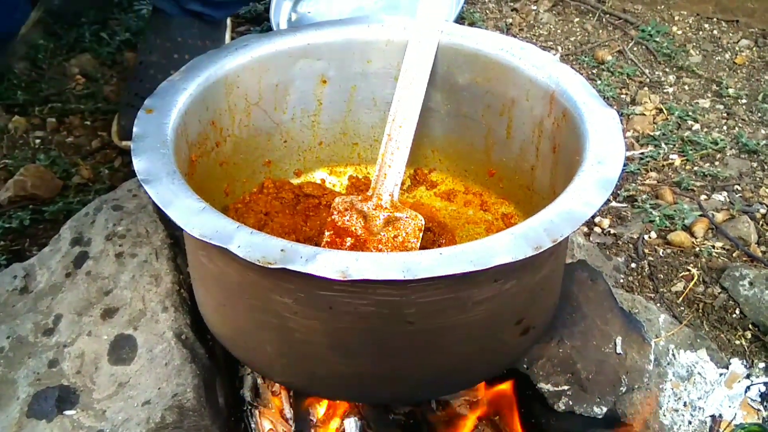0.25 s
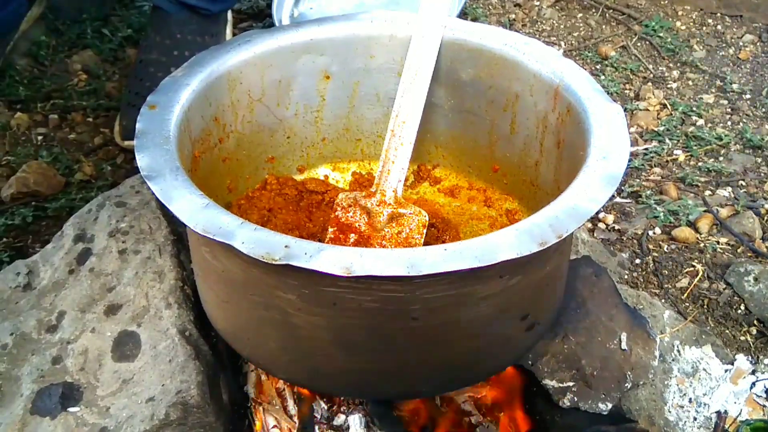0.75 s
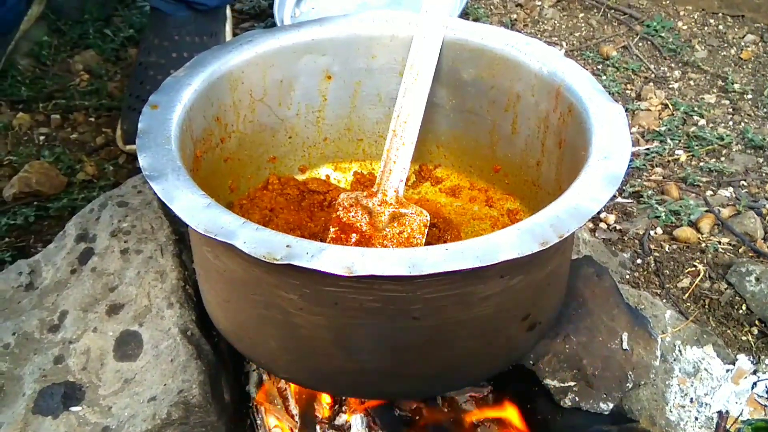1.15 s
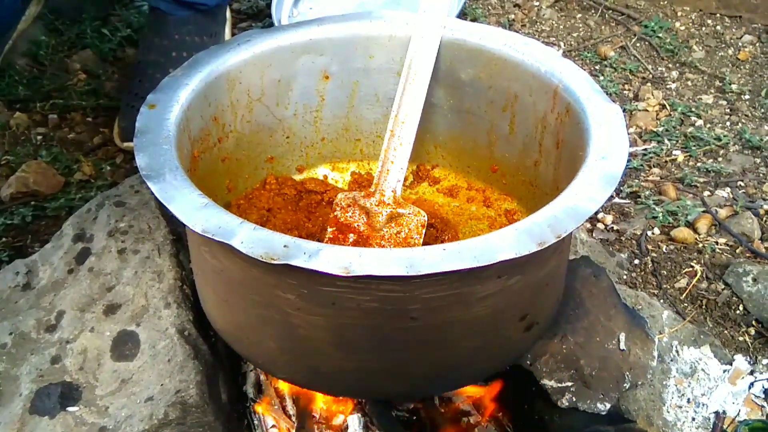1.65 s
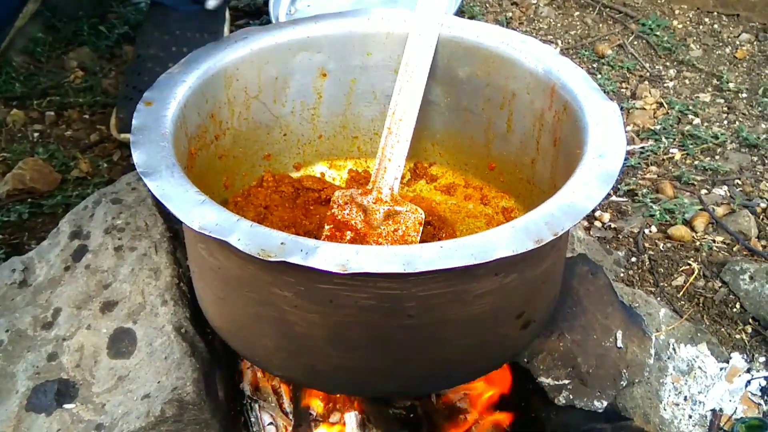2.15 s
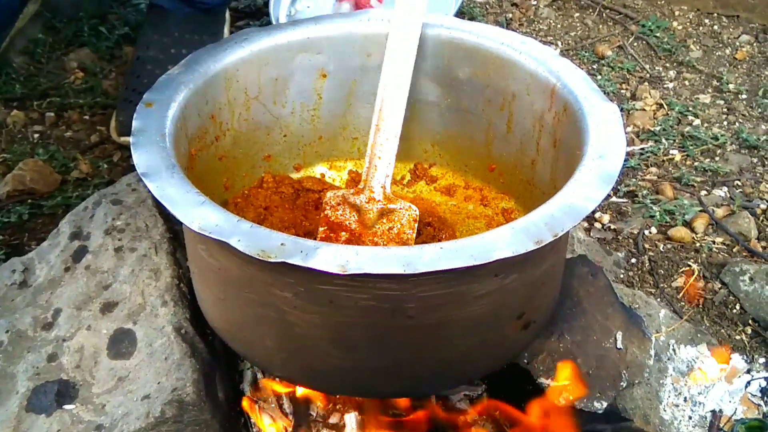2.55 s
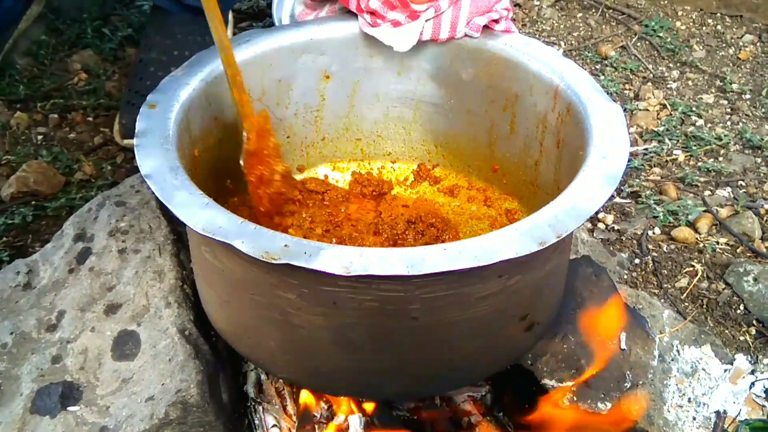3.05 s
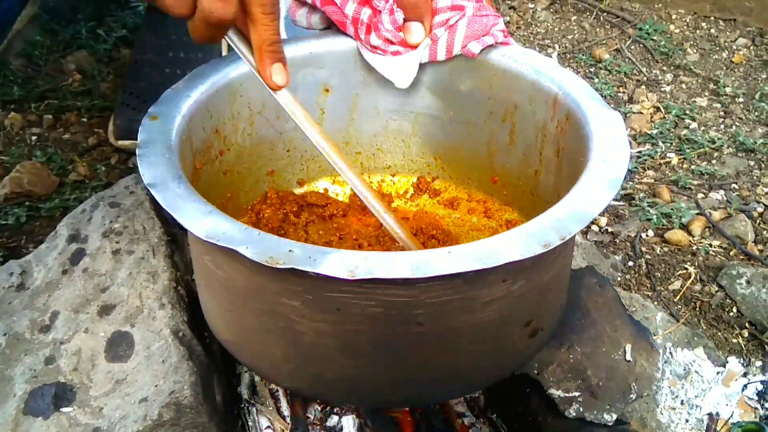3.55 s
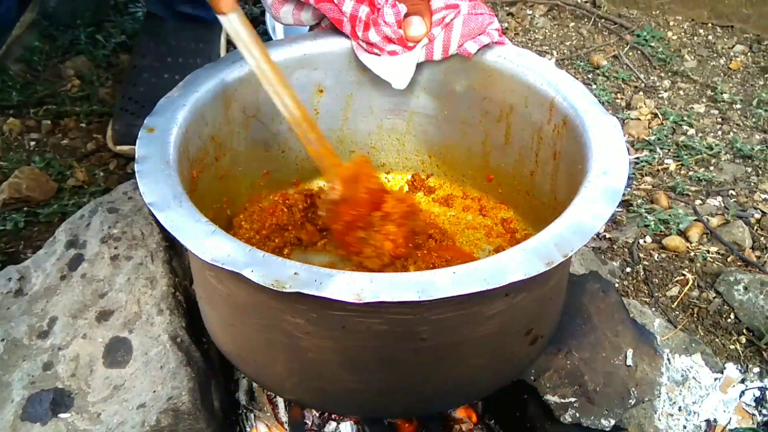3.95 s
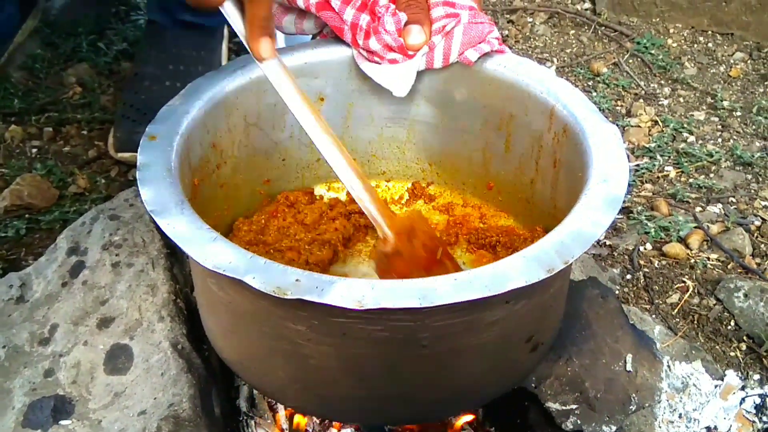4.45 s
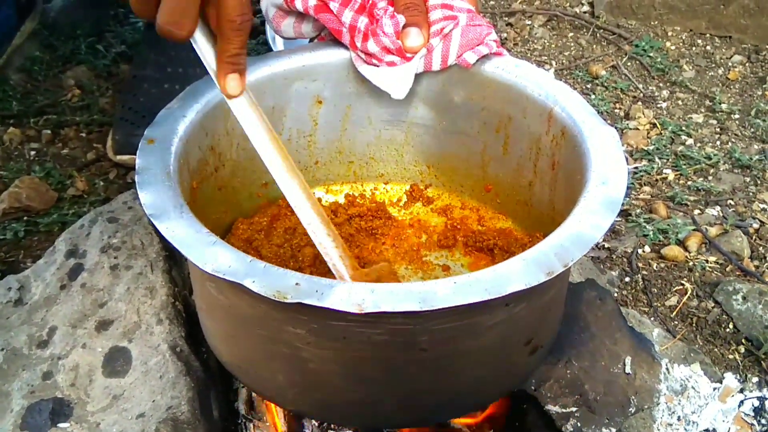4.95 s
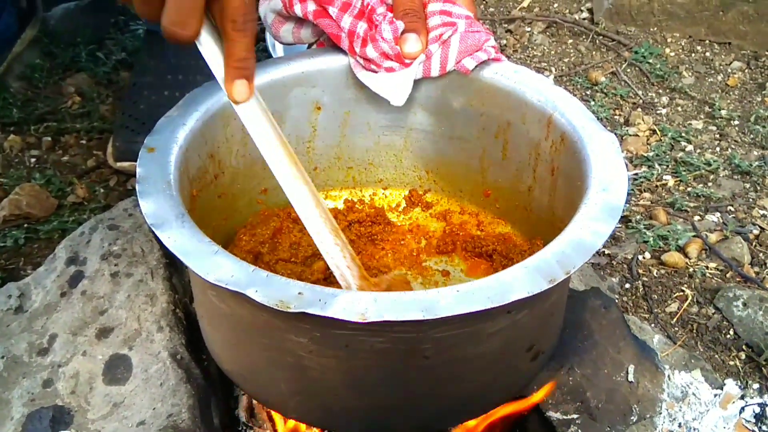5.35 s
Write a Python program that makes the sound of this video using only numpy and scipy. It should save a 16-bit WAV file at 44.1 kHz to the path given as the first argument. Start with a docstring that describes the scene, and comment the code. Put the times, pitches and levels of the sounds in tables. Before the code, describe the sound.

Thick spiced paste fries in a wide metal pot over an outdoor wood fire. At first the oil crackles and spits, with faint bubbling, a low flutter of flames and the odd crack of firewood. About halfway through, a spatula starts stirring, knocking and scraping the pot and slapping the wet paste. The crackle turns into a louder, fine hiss that swells with most strokes. It is heard from close above the pot.

```python
"""Fish masala fries outdoors in a wide aluminium pot over a wood fire.
From the start, steam bursts through the oil in crackles and spits, while thick paste mutters,
flames flutter below and the firewood cracks now and then. From about 3 s a spatula stirs: it knocks
and scrapes the pot and slaps the paste about. By 3.5 s wet paste is spread on hot metal, and the
crackle gives way to a fine hiss that swells with most of the strokes until the end."""
import sys
import numpy as np
from scipy import signal
from scipy.fft import rfft, irfft, next_fast_len
from scipy.io import wavfile
from scipy.ndimage import uniform_filter1d

SR = 44100
rng = np.random.default_rng(int(sys.argv[2]) if len(sys.argv) > 2 else 0)


def digitize_waveform(pressure):
    """Quantize a signal to 16-bit integers and store it at the path in sys.argv[1].

    Rows of a 2-D input are taken as channels; values are limited to [-1, 1].
    """
    field = np.atleast_2d(pressure).T
    bounded = np.clip(field, -1, 1)
    quanta = np.round(bounded * 32767).astype(np.int16)
    wavfile.write(sys.argv[1], SR, quanta)


N = 246959
TIME = np.arange(N) / SR

# how hard the food fries, before stirring swells it: t/s, level/dB
FRYING_LEVEL = [(0.0, -38.5), (1.18, -40.5), (2.1, -41), (2.23, -43.5), (2.4, -39.5), (2.73, -43),
                (3.55, -34.5), (3.87, -39), (3.99, -36), (4.35, -30.5), (4.63, -34), (5.08, -32.5),
                (5.6, -35)]
# wet paste freshly spread on hot metal: t/s, share of the frying that is fizz/0-1
FRESH_PASTE = [(0, 0.11), (3.1, 0.22), (3.5, 0.96), (4.1, 0.97)]
# tone of the coarse crackle (how strong each frequency is): f/Hz, level/dB
CRACKLE_TONE = [(1000, -50), (2700, -64), (2990, 7.5), (3700, 16.5), (5300, 16.5), (7500, 14), (10000, 7.5),
                (11300, -5), (13000, -17), (15500, -31)]
# tone of the fine fizz: f/Hz, level/dB
FIZZ_TONE = [(1000, -32), (2600, -27), (3400, -2), (4500, -2.5), (6400, 1), (8000, -2.5), (10000, -6),
             (11500, -12.5), (13000, -9), (15500, -5.5)]
def frying():
    """Steam bursts through the oil: loose crackle at rest, dense fizz where paste meets hot metal."""
    level_db, fresh = curve(FRYING_LEVEL), curve(FRESH_PASTE)
    _, _, swell_db = stirring()
    coarse = clicks(per_s=1700 * from_db(4 * drift(per_s=35)), spread_db=5.4, limit=3.2)
    pops = bubbles(coarse, width_hz=1000, snap=.22, echo_s=.003, scatter=.055)
    crackle = steady(colour(pops, CRACKLE_TONE), samples=7000)
    fine = clicks(per_s=5500, spread_db=5, limit=2.93)
    fizz = colour(bubbles(fine, width_hz=1600, snap=.088, echo_s=.012, scatter=.078), FIZZ_TONE)
    # thin paste fizzes only high up, a thick fresh layer lower down as well
    thin_fizz = cut(fizz, 3630, "high", order=8)
    thickness = np.clip((fresh - .2) * 2, 0, 1)
    fizz = steady(thickness * fizz + (1 - thickness) * thin_fizz, samples=4000)
    mix = from_db(-.93) * np.sqrt(1 - fresh) * crackle + np.sqrt(fresh) * fizz
    return from_db(level_db + swell_db) * mix


def bubbles(train, width_hz, snap, echo_s, scatter, count=16):
    """Each bubble snaps, rings at its own pitch and echoes between the pot's walls."""
    pitch_index = rng.integers(0, count, N)
    noise = rng.standard_normal(N)
    fade = np.exp(-2 / (echo_s * SR))
    out = np.zeros(N)
    for k, hz in enumerate(np.linspace(3200, 13000, count)):
        pops = train * (pitch_index == k)
        energy = signal.lfilter([1], [1, -fade], pops ** 2 + 1e-18)
        echoes = pops + scatter * np.sqrt(energy) * np.roll(noise, k * N // count)
        out += resonance(echoes, hz, width_hz) + snap * echoes
    return out


# spits of oil and cracks of firewood: t/s, relative level/dB, f/Hz, relative level of the low body/dB
SPITS_AND_CRACKS = [(.0363, -13, 3670, -41.5), (.0558, -14.5, 8250, -59), (.088, -17, 3920, -48),
                    (.198, -18, 5350, -66), (.3182, -17, 4760, -70), (.3772, -14.5, 6500, -67),
                    (.3857, -17, 6800, -58), (.4355, -14, 5750, -49), (.4898, -18.5, 5000, -68),
                    (.5341, -25, 4500, -68), (.5578, -9.5, 3800, -34.5), (.6384, -20.5, 3800, -49),
                    (.6605, -21, 3700, -69), (.7108, -19, 4550, -68), (.8316, -17, 5200, -66),
                    (.8637, -21, 4900, -47), (.8764, -17.5, 7500, -45.5), (1.023, -24, 3860, -66),
                    (1.0626, -15.5, 6060, -65), (1.2064, -25, 6300, -68), (1.3746, -20.5, 4860, -72),
                    (1.443, -16, 6300, -59), (1.4843, -17.5, 7400, -54), (1.6697, -13.5, 5630, -50),
                    (1.7194, -13, 3770, -29.5), (1.804, -30, 3670, -33.5), (1.9131, -18, 9800, -49),
                    (2.0081, -8, 4330, -34.5), (2.3021, -12, 4650, -55), (2.4152, -23, 4440, -72),
                    (2.5573, -14, 5530, -36.5), (3.311, -19.5, 5000, -62), (3.817, -9, 4270, -50),
                    (4.37, -4, 6200, -42)]
# tone of their dull low body: f/Hz, level/dB
LOW_BODY_TONE = [(450, 0.5), (800, -6), (1090, 6), (1320, -1.5), (2700, -9.5), (4000, 3)]
def spits_and_cracks():
    """Sharp spits of oil and cracks of firewood: a bright spatter, a snap and a dull low body."""
    out = np.zeros(N)
    for start, db, hz, body_db in SPITS_AND_CRACKS:
        echoes = burst(fade_s=.0025, scatter=.17)
        spatter = resonance(echoes, hz, width_hz=1800) + .1 * cut(echoes, 10000, "low")
        spatter = cut(spatter, 3100, "high", order=10)
        add(out, start, db - 3, cut(spatter, 9450, "low", order=4))
        snap = cut(burst(fade_s=.0012, scatter=.058), 11000, "high", order=4)
        add(out, start, db - 13, snap)
        low_body = colour(burst(fade_s=.025, scatter=.035), LOW_BODY_TONE)
        add(out, start, body_db + 11.5, low_body)
    return out


# spatula strokes: t/s, length/s, scrape level/dB, level of the push on the paste/dB, hiss swell/dB
SPATULA_STROKES = [(3.185, 0.069, -41, -45, -3), (3.36, 0.079, -41.5, -31.5, -1.5),
                   (3.46, 0.44, -47, -56.5, 1.5), (3.751, 0.2, -41, -47.5, 6), (3.989, 0.2, -38, -43.5, 4),
                   (4.217, 0.16, -39, -49, 0), (4.424, 0.17, -40, -47, 3.5),
                   (4.638, 0.13, -40.5, -42.5, 2.5), (4.847, 0.16, -41, -45, 1),
                   (5.061, 0.16, -39.5, -44, 0.5), (5.239, 0.14, -43, -42.5, 1.5)]
def stirring():
    """Each stroke bites, holds and eases off. Gives scrape gain, push gain and the hiss swell in dB."""
    bite_s, ease_s = .069, .05
    starts, lengths, scrape_db, push_db, swell_db = np.transpose(SPATULA_STROKES)
    age = TIME - starts[:, None]  # one row for each stroke
    bite = np.clip(age / bite_s, 0, 1)
    ease = np.exp(-np.maximum(age - lengths[:, None], 0) / ease_s)
    pressure = bite * ease
    return from_db(scrape_db) @ pressure, from_db(push_db) @ pressure, swell_db @ pressure


# tone of the gritty scrape: f/Hz, level/dB
GRIT_TONE = [(400, -0.5), (900, -18), (1130, 6), (1500, -3), (2100, 0.5), (2600, -5), (4000, 4.5)]
def scraping():
    """The blade catches and slips on grit and metal, and churns and squelches through the paste."""
    scrape, push, _ = stirring()
    slips = clicks(per_s=1200, spread_db=1)
    grind = wall_echo(colour(slips, GRIT_TONE)) + from_db(-16) * unit_power(pot_ring(slips, height=.7))
    grind = from_db(2.2 * drift(per_s=30)) * steady(grind, samples=3000)
    churn = air_pockets(clicks(per_s=130, spread_db=3), low_hz=330, high_hz=2300, width_hz=60)
    squelch_tone = [(230, 11.5), (390, -3.5), (500, 12), (620, 9), (760, -4), (1080, -4.5), (1500, -14)]
    squelch = colour(clicks(per_s=550, spread_db=1), squelch_tone)
    return scrape * (grind + from_db(-12) * churn) + push * steady(squelch, samples=3000)


def wall_echo(scrape):
    """The near wall echoes the scrape; the delay wanders with the blade, so the tone keeps shifting."""
    delay_s = .002053 * from_db(2.14 * drift(per_s=7))
    return scrape + .6 * np.interp(TIME - delay_s, TIME, scrape)


# the spatula hits the pot: t/s, peak level/dB, treble limit f/Hz, chatter fade/s,
# then pot ring, blade ring and thud (each level/dB against the clack), height up the wall/0-1
SPATULA_KNOCKS = [(3.1948, -12.5, 7500, 0.0077, 1, -13.5, -19, 0.68),
                  (3.67, -18, 1600, 0.0021, -6, -7.5, -5.5, 0.17),
                  (3.924, -8, 6000, 0.0032, -20, -12, -15, 0.1), (4.176, -23, 1420, 0.013, -26, -15, 2, 0),
                  (5.162, -5.5, 8850, 0.0043, -31, -9, -22, .5)]
# tone of the clack of blade on wall: f/Hz, level/dB
CLACK_TONE = [(300, 9), (800, -30), (1070, 12), (1400, 0.5), (1800, -3.5), (2700, -2), (3600, 13),
              (6000, 13.5), (9000, 6.5), (15000, 5)]
def knocks():
    """The blade chatters against the pot; the loaded bottom thuds, and wall and blade ring on."""
    blade_hz, thud_hz = 2127, 550
    out = np.zeros(N)
    for start, db, treble_hz, fade_s, pot_db, blade_db, thud_db, height in SPATULA_KNOCKS:
        force = cut(burst(fade_s, scatter=.26), treble_hz, "low", order=3)
        clack = colour(force, CLACK_TONE)
        ring = from_db(pot_db) * unit_power(pot_ring(force, height))
        blade = from_db(blade_db) * unit_power(resonance(force, blade_hz, width_hz=35))
        bottom = resonance(force, thud_hz, width_hz=150)
        thud = from_db(thud_db) * unit_power(resonance(bottom, thud_hz, width_hz=150))
        add(out, start, db, clack + ring + blade + thud)
    return out


# the pot's own notes: f/Hz, level/dB, time to fade by 60 dB/s, extra level when hit at the top/dB
POT_NOTES = [(1067, 8, .1, 8.5), (1130, 18.5, 0.04, -13), (1317, -3.5, 0.18, 13), (1464, -3.5, 0.09, 12),
             (1628, -11, 0.16, 17), (2237, -11, 0.12, 8), (4140, 14, 0.041, 3), (4594, 8.5, .045, 3)]
def pot_ring(force, height=0):
    """The pot rings, muffled by the food in it; a blow higher up wakes the notes of the bare wall."""
    out = 0
    for k, (hz, db, ring_s, wall_db) in enumerate(POT_NOTES):
        fade = from_db(-60 / (ring_s * SR))
        step = 2 * np.pi * hz / SR
        note = signal.lfilter([np.sin(step)], [1, -2 * fade * np.cos(step), fade * fade], force + 1e-18)
        out = out + (-1) ** k * from_db(db + height * wall_db) * note
    return out


# rasps and groans of the blade: t/s, length/s, first f/Hz, last f/Hz, level/dB
BLADE_RASPS = [(3.755, 0.14, 2037, 1764, -42), (4.245, 0.12, 3000, 2550, -42), (4.24, 0.16, 350, 310, -44),
               (4.3, 0.43, 205.3, 247.6, -41.5), (4.47, .12, 2290, 1880, -48),
               (4.51, 0.19, 1514, 1850, -45.5)]
def rasps():
    """The blade sticks and slips unevenly, making a rough note that glides as the contact point moves."""
    out = np.zeros(N)
    for start, length, first_hz, last_hz, db in BLADE_RASPS:
        progress = np.clip((TIME - start) / length, 0, 1)
        phase = 2 * np.pi * np.cumsum(first_hz + (last_hz - first_hz) * progress) / SR
        rough_note = sum(drift(per_s=first_hz / 6) * wave(phase) for wave in (np.cos, np.sin))
        out += from_db(db) * np.sin(np.pi * progress) * steady(rough_note, samples=2500)
    return out


# soft slaps and plops in the paste: t/s, peak level/dB, f/Hz, fade/s
PASTE_SLAPS = [(0.393, -48.5, 1100, 0.022), (.729, -34, 760, 0.013), (.755, -39, 745, 0.028),
               (1.488, -49, 1110, 0.033), (3.401, -24.5, 540, 0.0081), (3.436, -27, 438, .005),
               (3.458, -30, 514, .006), (3.706, -30.5, 580, 0.011), (4, -28, 527, 0.0048),
               (4.579, -25, 487, 0.023), (5.231, -27, 510, 0.0029), (5.434, -21.5, 382, 0.0045)]
def slaps():
    """Lumps of paste flop down and small air pockets close."""
    out = np.zeros(N)
    for start, db, hz, fade_s in PASTE_SLAPS:
        flop = resonance(burst(fade_s, scatter=.6), hz, width_hz=200)
        add(out, start, db, resonance(flop, hz, width_hz=216))
    return out


# how hard the paste simmers: t/s, relative level/dB
SIMMER_LEVEL = [(0, -35.5), (1.35, -42.5), (2.9, -40), (3.17, -45), (3.5, -31)]
def simmer():
    """Thick paste mutters in fits of dull ticks and small bubbles; the pot and its air ring hollowly."""
    tick_tone = [(550, 5), (800, .5), (1150, -3.5), (1500, -5), (2200, -5), (2600, -18)]
    ticks = colour(clicks(per_s=1500, spread_db=.5), tick_tone)
    ring = unit_power(pot_ring(ticks * flicker(depth_db=8, per_s=18)))  # ticks reach the wall unevenly
    air_notes_hz = np.geomspace(1150, 2400, 9)
    hollow = sum(resonance(ticks, hz, width_hz=90) * from_db(5.5 * drift(per_s=16))
                 for hz in air_notes_hz)
    hollow = unit_power(cut(hollow, 2300, "low", order=6))
    blips = air_pockets(clicks(per_s=90, spread_db=3), low_hz=850, high_hz=2450, width_hz=70)
    mutter = from_db(-39) * ticks + from_db(-24) * ring + from_db(-29) * hollow
    fits = unit_power(flicker(depth_db=3.5, per_s=14))
    return from_db(curve(SIMMER_LEVEL)) * (fits * mutter + from_db(-34) * blips)


def air_pockets(train, low_hz, high_hz, width_hz, count=14):
    """Each click opens an air pocket in the paste that rings at a pitch of its own."""
    pitch_index = rng.integers(0, count, N)
    out = np.zeros(N)
    for k, hz in enumerate(np.geomspace(low_hz, high_hz, count)):
        ring = resonance(train * (pitch_index == k), hz, width_hz)
        out += resonance(ring, hz, hz / 4)
    return unit_power(out)


# tone of the flames' roar: f/Hz, level/dB
ROAR_TONE = [(33, -18.5), (60, 0), (110, 1.5), (170, -5), (240, -9.5), (340, -14), (480, -28.5), (800, -57)]
def fire():
    """Flames swirl under the pot: deep swirls, and higher ones that flicker in their own time."""
    deep_db, upper_db = flame_levels()
    roar = colour(rng.standard_normal(N), ROAR_TONE)
    deep = steady(cut(roar, 190, "low"), samples=1400)
    upper = steady(cut(roar, 190, "high"), samples=1400)
    # the two filters leave the halves opposite in sign, so subtracting joins them
    return from_db(deep_db) * deep - from_db(upper_db + drift(per_s=25)) * upper


# tone of the tongues of flame: f/Hz, level/dB
TONGUE_TONE = [(200, -10), (300, 1.5), (560, -6), (750, -11.5), (1000, -40)]
def flame_tongues():
    """Tongues of flame tear off the higher swirls in short flutters."""
    _, upper_db = flame_levels()
    tongues = colour(rng.standard_normal(N), TONGUE_TONE) * flicker(depth_db=6, per_s=45)
    return from_db(upper_db - 9.5) * unit_power(tongues)


# steady burn of the fire: t/s, level/dB
BURN_LEVEL = [(0, -46), (.18, -47), (.5, -38.5), (1.1, -40.5), (1.35, -44.5), (2, -43.5), (2.45, -48),
              (3.9, -36.5), (5.6, -44)]
# the flames flare up: peak t/s, deep swirls' level/dB, higher swirls' level/dB
FLARE_UPS = [(.24, -33.5, -58), (.29, -32.5, -61), (0.431, -56, -41.5), (1, -39, -40), (1.11, -57, -39.5),
             (1.42, -32.5, -38), (1.59, -57, -49), (2.17, -29.5, -47), (2.235, -25.5, -44.5),
             (2.81, -35.5, -70), (3.111, -32.5, -53), (3.77, -29.5, -37.5), (4.789, -27.5, -43),
             (4.98, -34, -48), (5.215, -34, -51), (5.5, -36, -40)]
def flame_levels():
    """The fire puffs at random and flares up briefly. Gives the deep and higher swirls' levels in dB."""
    flare_s, upper_offset_db = .021, -8.5
    burn_db = curve(BURN_LEVEL) + 2.3 * drift(per_s=22)
    power = from_db([burn_db, burn_db + upper_offset_db]) ** 2
    for peak_s, *levels_db in FLARE_UPS:
        flare = np.exp(-np.minimum(((TIME - peak_s) / flare_s) ** 2, 20))
        power += np.outer(from_db(levels_db) ** 2, flare)
    return 10 * np.log10(power)


def clicks(per_s, spread_db, limit=2.2):
    """Random clicks, many small and a few large."""
    sizes = from_db(spread_db * np.minimum(rng.exponential(1, N), limit))
    return sizes * rng.choice([-1, 1], N) * (rng.random(N) < per_s / SR)


def burst(fade_s, scatter):
    """One sharp click followed by a dying scatter of small ones."""
    t = TIME[:SR // 4]
    out = scatter * rng.standard_normal(len(t)) * np.exp(-t / fade_s)
    out[0] = 1
    return out


def drift(per_s):
    """A line that wanders between random values, about one either side of zero."""
    turns = np.arange(0, N / SR + 1, 1 / per_s)
    return np.interp(TIME, turns, rng.standard_normal(len(turns)))


def flicker(depth_db, per_s):
    """A gain that wavers at random, at most depth_db up or down."""
    return from_db(depth_db * np.tanh(drift(per_s)))


def colour(x, tone):
    """Give a sound the tone drawn by (f/Hz, level/dB) points, at a power of one."""
    size = next_fast_len(len(x) + SR // 4, real=True) // 2 * 2
    hz, db = np.transpose(tone)
    octave = np.log2(np.maximum(np.arange(size // 2 + 1) * SR / size, 1))
    octaves_outside = np.abs(octave - np.clip(octave, np.log2(hz[0]), np.log2(hz[-1])))
    gain = from_db(np.interp(octave, np.log2(hz), db) - 18 * octaves_outside)
    # a minimum-phase filter: it rings after each click, never before
    cepstrum = irfft(np.log(gain))
    cepstrum[0] = 0
    response = np.exp(rfft(2 * cepstrum[:size // 2], size))
    return unit_power(irfft(rfft(x, size) * response)[:len(x)])


def cut(x, hz, keep, order=2):
    """Keep the "low" or the "high" side of a frequency; a higher order cuts more steeply."""
    return signal.sosfilt(signal.butter(order, hz, keep, fs=SR, output="sos"), x)


def resonance(x, hz, width_hz):
    """Ring at one pitch; the narrower the width, the longer the ring."""
    fade = np.exp(-np.pi * width_hz / SR)
    feedback = [1, -2 * fade * np.cos(2 * np.pi * hz / SR), fade * fade]
    return signal.lfilter(np.array([1, 0, -1]) * (1 - fade * fade) / 2, feedback, x + 1e-18)


def steady(x, samples):
    """Even out the loudness over a sliding window, keeping the finer grain."""
    power = uniform_filter1d(uniform_filter1d(x ** 2, samples), samples)
    return x / np.sqrt(np.abs(power) + 1e-12)


def add(track, start_s, db, sound):
    """Place a sound at its time with the given peak level."""
    at = int(start_s * SR)
    track[at:at + len(sound)] += (from_db(db) * sound / np.abs(sound).max())[:N - at]


def curve(points):
    """Join (t/s, value) points with straight lines."""
    return np.interp(TIME, *np.transpose(points))


def from_db(db):
    """Turn decibels into a gain to multiply by."""
    return 10 ** (np.asarray(db) / 20)


def unit_power(x):
    """Scale a sound to an average power of one."""
    return x / np.sqrt(np.mean(x ** 2) + 1e-20)


def scene():
    """Food, spatula and fire, heard from close above the pot, the same in both ears."""
    cooking = frying() + spits_and_cracks() + simmer()
    spatula = scraping() + rasps() + knocks()
    mono = cooking + spatula + slaps() + fire() + flame_tongues()
    return np.array([mono, mono])


def record(dry):
    """The very highest treble is cut away steeply."""
    cutoff_hz = 15600
    return signal.sosfilt(signal.ellip(10, .2, 80, cutoff_hz, fs=SR, output="sos"), dry)


dry = scene()
out = record(dry)
digitize_waveform(out)
```